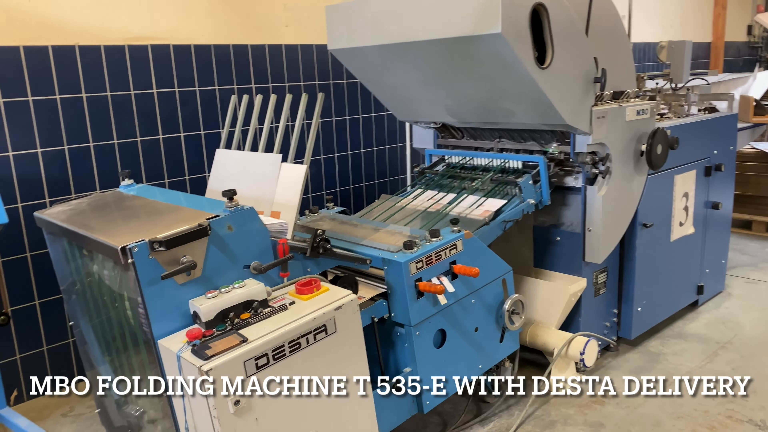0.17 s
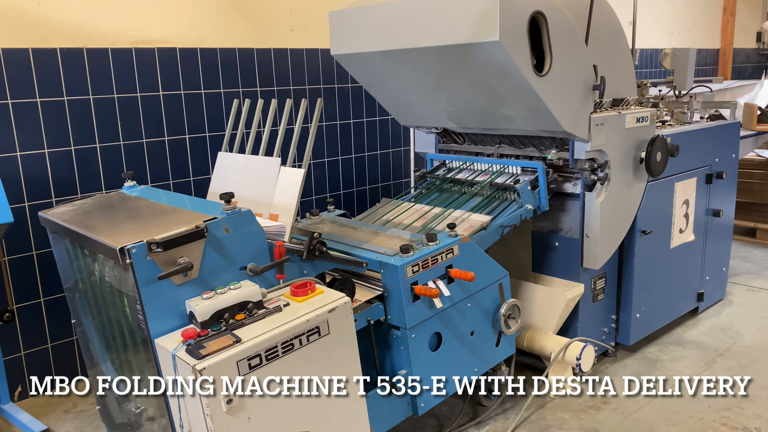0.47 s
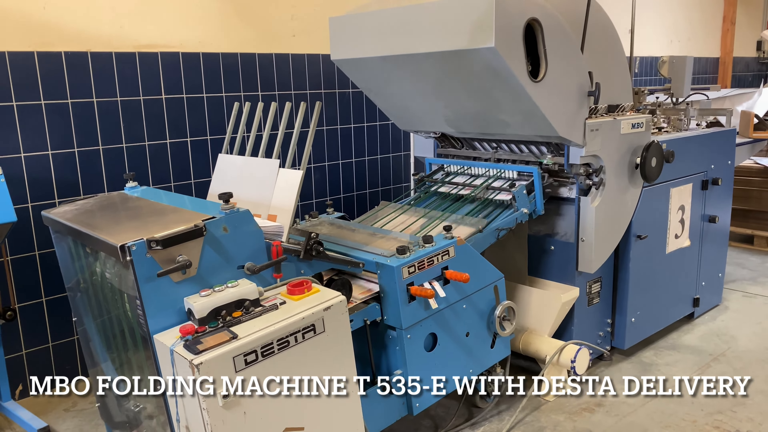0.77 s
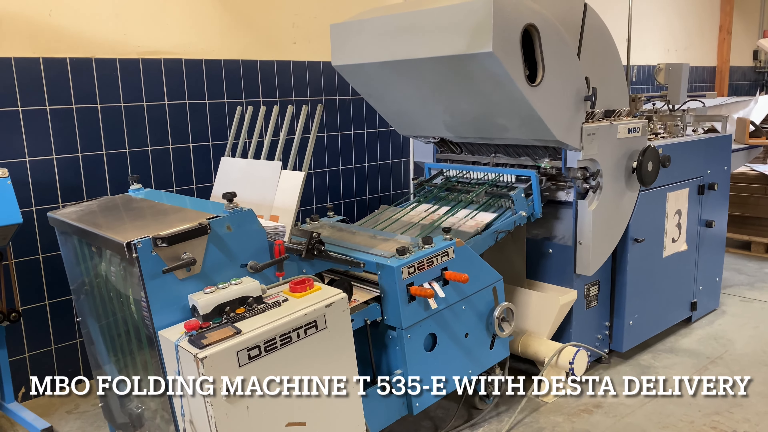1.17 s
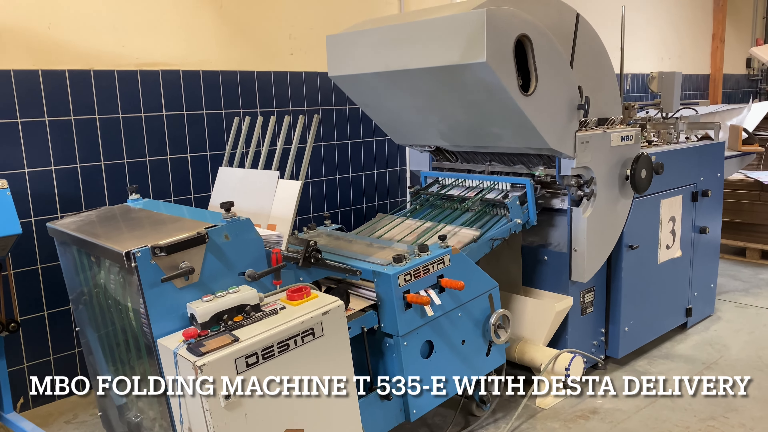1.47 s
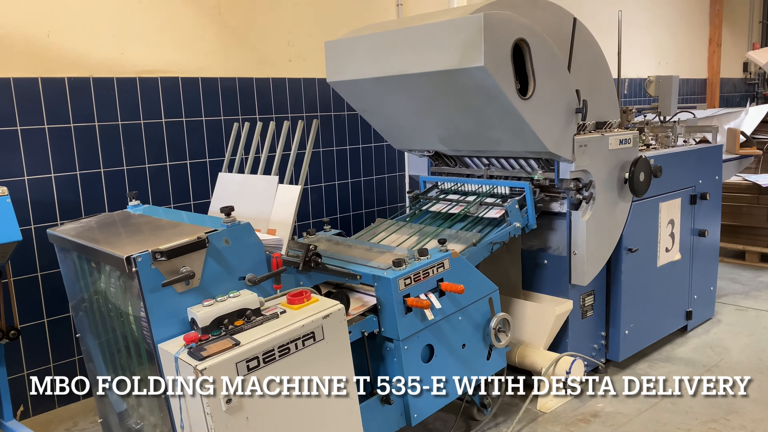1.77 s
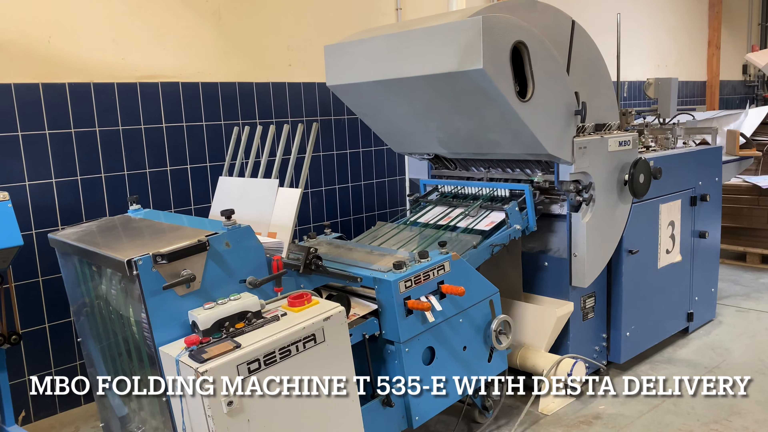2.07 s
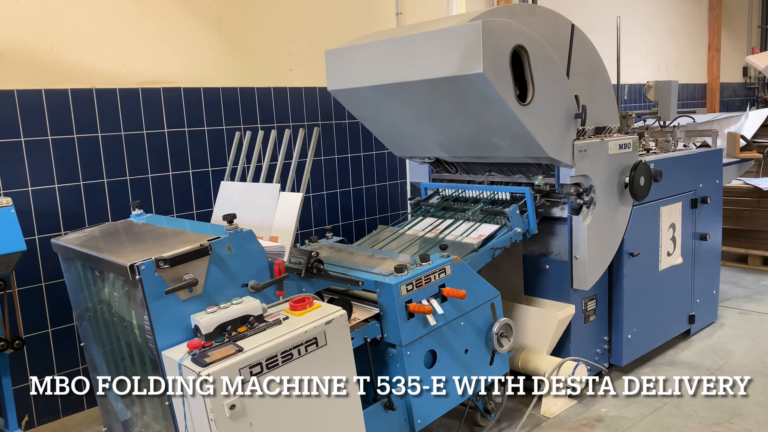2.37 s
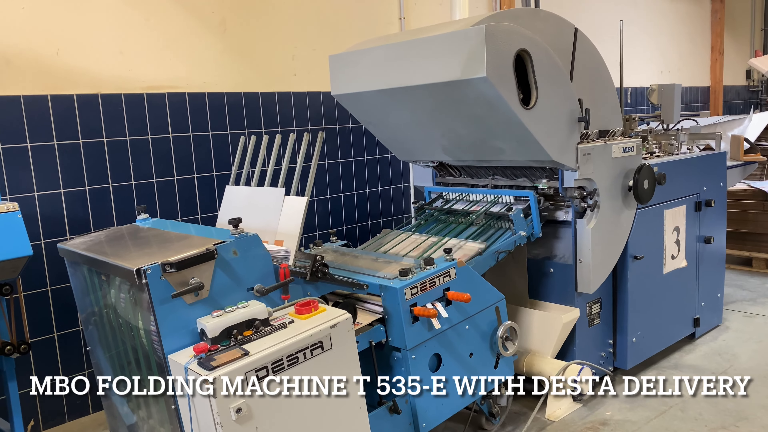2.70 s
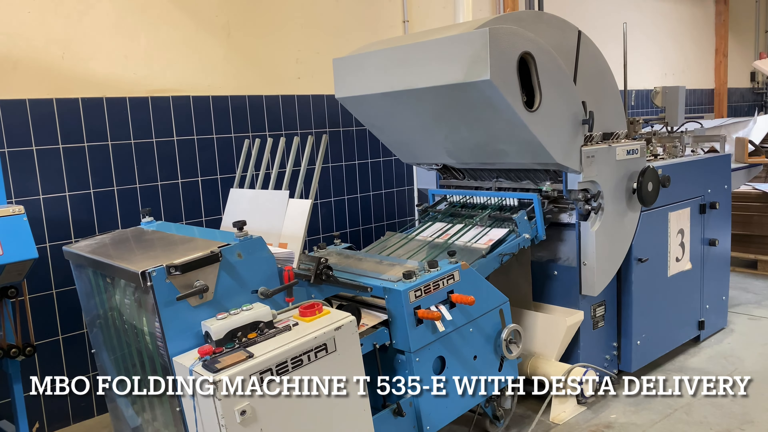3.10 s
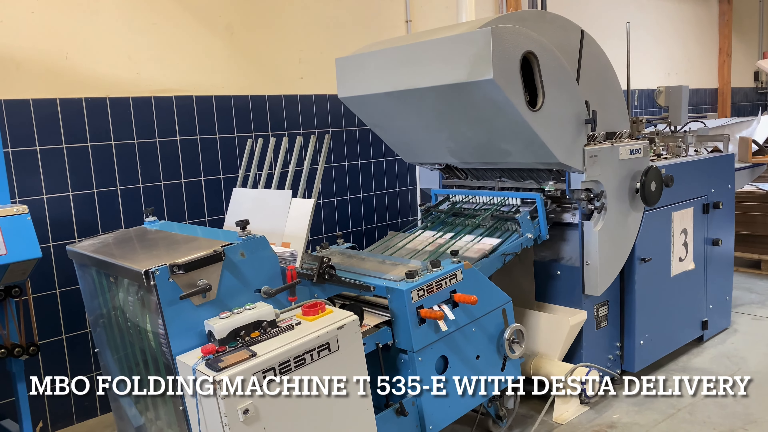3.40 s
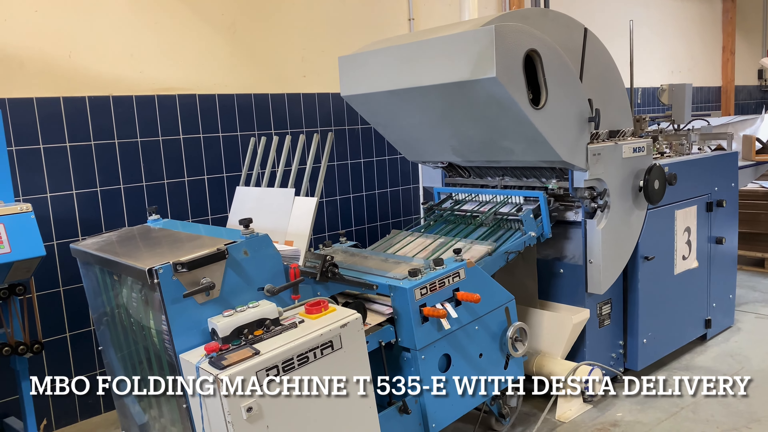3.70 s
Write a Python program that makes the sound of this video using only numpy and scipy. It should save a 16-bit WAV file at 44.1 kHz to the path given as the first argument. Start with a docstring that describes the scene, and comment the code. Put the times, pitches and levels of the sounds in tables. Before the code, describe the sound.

A paper folding machine is already running at 0 s and continues to about 4 s in a reverberant workshop. Every quarter second, two bright steel clacks fall almost together, then a lighter tap and airy paper swish. Grainy roller rattle, random ticking, hiss, low rumble and faint whines persist. Brief rough squeals recur mostly before 2.5 s, strongest near 1 s; the running noise softens slightly after 3 s.

```python
"""A paper folding machine in a tiled workshop: steel blows of noise, clinks and frame modes, four sheets a second.
Each sheet brings two clacks, then a lighter tap just over half a cycle later and a swish of filtered noise.
Underneath, grainy noise makes rollers, air hiss, motor rumble and a hollow drone; small clinks make the ticking.
Unsteady sines make the drive whines and a recurring rough squeal; noise-fed resonators hum as the frame.
Two low knocks come from the body, and the room answers each blow with a tail of fading noise."""
import sys
import numpy as np
from scipy import signal
from scipy.fft import rfft, irfft, next_fast_len
from scipy.io import wavfile
from scipy.ndimage import map_coordinates

SR = 44100
rng = np.random.default_rng(int(sys.argv[2]) if len(sys.argv) > 2 else 0)


def unload_audio(sound):
    """Save the sound as a 16-bit wav file, at the path given as the first command line argument."""
    columns = np.transpose(np.atleast_2d(sound))
    # keep every value between -1 and 1, then stretch to whole-number steps
    steps = np.round(np.clip(columns, -1, 1) * 32767)
    wavfile.write(sys.argv[1], SR, steps.astype(np.int16))


N = 169785

# The blows of each sheet, relative levels: first_clack_s, first_clack_db, second_clack_db, tap_db,
# frame_ring_db, first_tilt_db_per_octave, second_opening_contact_db, second_tilt_db_per_octave
SHEETS = [(.065, 0, 2.5, -1, 0, 1, -1, -3.5), (.314, 1, 0, -1.5, -1.5, -2.5, 6, 2),
          (.562, 1.5, 0, 0.5, 0, -2, -8, 1), (.809, 1.5, 1, 0, -4, -1, 4.5, -.5),
          (1.055, -0.5, 2.5, 1, -4, -1, 2.5, -3), (1.302, 0, -1.5, -0.5, 0.5, -.5, 8.5, -2),
          (1.549, -0.5, -3.5, -3.5, 0.5, -2, 5, 2.5), (1.795, -1, -0.5, -0.5, 1.5, 0, 9.5, 1.5),
          (2.041, 0.5, 1, 0, -3, -3, 6.5, -1.5), (2.289, 1.5, 2.5, -6.5, -1, -3, 3, 3),
          (2.537, 0, 1, -2, -7, -1, -8, -2.5), (2.784, -1, 1, -2.5, 0, .5, 3.5, 0.5),
          (3.031, -3, -3, -2, 2.5, 0.5, -5, 2.5), (3.278, -5.5, -2.5, -4, 2.5, 2, -7, 0.5),
          (3.525, -3.5, -2, -6, 1, 1, -3, 2), (3.772, -4.5, 0.5, -12, -3.5, 2.5, -1, 0.5)]
SECOND_S, TAP_S = .0213, .1398  # after the first clack
# Contacts within one blow: delay_s, level_db
FIRST_BOUNCES = [(.0002, -3), (.0025, -2), (.0068, -1)]
SECOND_BOUNCES = [(0, -2.5), (.0026, -2), (.0075, -3)]
TAP_BOUNCES = [(0, -2.5), (.0022, -5.5)]
# Relative colour of each kind of blow: frequency_hz, level_db
FIRST_COLOUR = [(200, -47), (420, -27.5), (620, -19.5), (950, 2.5), (1200, -7), (1450, -4.5), (2200, -1),
                (3600, 2), (4800, -3), (5800, -10), (7400, -11.5), (9000, -7), (12000, -13.5), (15500, -27)]
SECOND_COLOUR = [(200, -40), (420, -26), (620, -19), (950, -16), (1200, -8), (1450, -2.5), (1800, 1.5),
                 (2400, 1.5), (3600, 2), (4700, 0), (5800, -6), (7400, -14.5), (9000, -7.5), (12000, -20),
                 (15500, -36)]
TAP_COLOUR = [(200, -23), (450, -17), (900, -7), (1200, -7.5), (1550, -7), (1900, -4.5), (2350, 1.5),
              (3200, -13), (4500, -6), (7400, -16.5), (9500, -13.5), (15500, -43)]
# Modes of the steel frame: pitch_hz, relative level_db, t60_s
FRAME_MODES = [(550.6, -10, 0.059), (642.5, -4.5, 0.12), (788.6, -10, 0.19), (916, -12.5, 0.084),
               (1363, -1.5, 0.12), (1427, 1.5, 0.099), (1525, -7, 0.11), (1705, 5.5, 0.076),
               (1821, 1.5, 0.12), (2080, -0.5, 0.11), (2146, -0.5, 0.14), (2595, -4, 0.2),
               (2870, 2.5, 0.086), (4200, 1, 0.069)]
# Course of the running noise, before each layer's offset: time_s, level_db
RUNNING = [(0.0, -30), (0.46, -30), (1.15, -30.5), (1.41, -31.5), (2.29, -31), (3.32, -34.5), (3.85, -34)]
# Relative colour of the steady noise layers: frequency_hz, level_db (per Hz)
ROLLER_COLOUR = [(150, -25), (460, -35), (570, -2.5), (660, 4), (820, 3), (1050, -1.5), (1250, -4),
                 (1650, 2.5), (2200, -4.5), (3000, -3.5), (4500, -6.5), (5800, -12), (7500, -14.5),
                 (12000, -62)]
AIR_COLOUR = [(2000, -24), (5000, 3), (6500, -4.5), (7500, -3.5), (8400, 0.5), (10200, 3.5), (12000, -1.5),
              (14200, -11.5), (15000, -51)]
RUMBLE_COLOUR = [(20, -28), (35, -10), (52, 2), (75, -1), (100, -3), (135, 0), (200, 2), (290, -4),
                 (350, -0.5), (450, -11), (800, -29)]
DRONE_COLOUR = [(220, -30), (320, -7.5), (500, 10), (620, -22)]
# Course of the hollow drone: time_s, level_db
DRONE_LEVEL = [(0, -47), (.7, -56), (2.2, -52.5), (3.1, -64)]
# Colour of the ticking: frequency_hz, relative level_db
TICK_COLOUR = [(300, -17), (650, 1.5), (2000, -0.5), (4500, 5), (7000, -9), (14000, -32)]
# Dull knocks in the machine's body: start_s, level_db
KNOCKS = [(.165, -41), (2.61, -46)]
# Gear and bearing tones: pitch_hz, level_db (rms, around which the running level moves)
WHINES = [(140, -65.5), (936, -72), (1189, -55), (1357, -59.5), (3968, -53), (6454, -57.5)]
# Spurts of squeal: middle_s, half_length_s, level_db
SQUEALS = [(0.093, 0.071, -37), (0.275, 0.055, -36.5), (0.497, .03, -39), (.755, 0.022, -37),
           (1.01, 0.044, -31), (1.244, .03, -42), (1.744, 0.023, -37), (2.237, .05, -38), (2.5, 0.038, -41),
           (3.21, 0.037, -42)]
SQUEAL_HZ, SQUEAL_LEAD_RAD = 1670, -1.4  # the lead is left over right
# Decay of the room: frequency_hz, t60_s
ROOM_DECAY = [(200, 0.45), (1000, 1), (3000, 0.55), (6000, 0.31), (14000, 0.18)]
# Phase between the two microphones for near and for diffuse sound: frequency_hz, left_lead_rad
NEAR_PHASE = [(300, -1), (700, -1.5), (950, -0.88), (1350, -2), (1750, -1.45), (2300, -2), (3500, -2.5),
              (4500, -4.5), (5500, -4), (6400, -5.5), (7500, -8.5), (9100, -4), (10000, -8), (12000, -4.5)]
FAR_PHASE = [(50, 0.66), (150, 2), (300, 1.62), (420, -2.05), (1300, -1.8), (2000, 0.45), (2800, 2.5),
             (4500, 1.5), (5500, -4), (6400, 2.5), (7500, -3), (9100, 2), (10000, -1.5), (12000, 0)]
# Likeness of left and right in diffuse sound, clipped to -1..1 in use: frequency_hz, likeness
ALIKE = [(50, 0), (150, 1), (320, 0.16), (600, 1), (1100, 0), (1700, 0.28), (4500, -0.02), (6400, 0.5),
         (9000, 0.6), (10500, 7.2), (12000, 9.7)]
# Channel balance: frequency_hz, left_minus_right_db
BALANCE = [(50, 0), (130, 6), (400, 2.5), (900, 0), (1400, -1.5), (2200, -0.5), (3500, -2), (5600, -3),
           (7100, 2.5), (7800, -4.5), (9000, 2), (9700, -2.5), (11500, 0)]
MONO_HZ, TOP_HZ = 11700, 15800  # one shared channel from MONO_HZ up; band limit


def amp(db):
    """Decibels to gain."""
    return 10 ** (np.asarray(db) / 20)


def unit(x):
    """Scale to rms 1."""
    return x / np.sqrt(np.mean(x ** 2) + 1e-20)


def along(points, hz):
    """Read (Hz, value) points on a log frequency axis."""
    f, v = np.transpose(points)
    return np.interp(np.log(hz + 1), np.log(f + 1), v)


def curve(rows):
    """Draw (s, value) points as one value per sample."""
    return np.interp(np.arange(N) / SR, *np.transpose(rows))


def wobble(rate):
    """A smooth random curve, rate knots a second."""
    knots = rng.standard_normal(int(N * rate / SR) + 4)
    return map_coordinates(knots, [np.arange(N) * rate / SR])


def filtered(x, response):
    """Shape x with a complex response of frequency."""
    n = x.shape[-1]
    m = next_fast_len(n + SR // 10, True)
    return irfft(rfft(x, m) * response(np.fft.rfftfreq(m, 1 / SR)), m)[..., :n]


def causal(points, size=1024):
    """A minimum-phase impulse response of energy 1 with the given colour."""
    cepstrum = irfft(np.log(amp(along(points, np.fft.rfftfreq(size, 1 / SR)))))
    # fold the cepstrum forward so that nothing sounds ahead of the blow
    cepstrum[1:size // 2] *= 2
    cepstrum[size // 2 + 1:] = 0
    h = irfft(np.exp(rfft(cepstrum)))
    return h / np.linalg.norm(h)


def add(track, s, sound):
    """Mix a sound into a track at s seconds."""
    i = max(0, round(s * SR))
    part = track[..., i:i + sound.shape[-1]]
    part += sound[..., :part.shape[-1]]


def ports(x, phase):
    """Set the phase difference between the two microphones."""
    halves = np.array([[1], [-1]])
    return filtered(x, lambda hz: np.exp(.5j * along(phase, hz) * halves))


def diffuse(pair):
    """Blend two unrelated signals into sound arriving from all round."""
    def weights(hz):
        turn = np.arccos(np.clip(along(ALIKE, hz), -1, 1)) / 2
        return np.array([np.cos(turn), np.sin(turn)])
    mid, side = filtered(pair, weights)
    return ports(np.array([mid + side, mid - side]), FAR_PHASE)


def rush(colour, grain_db):
    """Diffuse noise of rms 1, broken into tiny impacts by grain_db."""
    pair = rng.standard_normal((2, N)) * amp(grain_db * wobble(700))
    return unit(diffuse(filtered(pair, lambda hz: amp(along(colour, hz)))))


def burst(t, t60, grain_db=0):
    """Dying noise of energy 1, broken into chatter by grain_db."""
    chatter = map_coordinates(rng.standard_normal(200), [t * 450])
    x = rng.standard_normal(len(t)) * amp(grain_db * chatter - 60 * t / t60)
    return x / np.linalg.norm(x)


def clink(t, centre_hz, spread, t60, count):
    """A small steel part rings briefly with energy 1, its modes drawn afresh each time."""
    hz = centre_hz * np.exp(spread * rng.standard_normal((count, 1)))
    hz = np.minimum(hz, TOP_HZ)
    modes = np.sin(2 * np.pi * (hz * t + rng.random((count, 1))))
    x = modes.sum(0) * amp(-60 * t / t60)
    return x / np.linalg.norm(x)


def tone(hz, waver_hz, flutter_db, port_turns):
    """An unsteady tone of rms 1 whose phase drifts between the microphones."""
    turns = np.cumsum(hz + waver_hz * wobble(40)) / SR
    drift = port_turns * np.array([wobble(2.7), wobble(2.87)])
    flutter = amp(flutter_db * np.tanh(2 * wobble(26)))
    return unit(flutter * np.sin(2 * np.pi * (turns + drift)))


def rollers():
    """Rollers and belts rattle: noise with a coarse grain and an uneven level."""
    return amp(curve(RUNNING) - 3.0 + 0.83 * wobble(24.86)) * rush(ROLLER_COLOUR, grain_db=3.0)


def ticks(per_s, centre_hz, t60, scatter_db):
    """Guide balls and linkage tick at random against the rollers; rms 1."""
    t = np.arange(SR // 12) / SR
    out = np.zeros((2, N))
    slots = rng.random((600, 4))
    for place, chance, size, side in slots:
        if chance < per_s * N / SR / len(slots):
            tick = clink(t, centre_hz, spread=.55, t60=t60, count=5) + .5 * burst(t, 0.0055)
            angle = 2 * np.pi * side
            pan = np.array([[np.cos(angle)], [np.sin(angle)]])
            add(out, place * N / SR, amp(scatter_db * size) * pan * tick)
    return unit(diffuse(filtered(out, lambda hz: amp(along(TICK_COLOUR, hz)))))


def air():
    """Air hiss: high, fine-grained noise with a slowly uneven level."""
    return amp(-40.0 + 1.6 * wobble(8.83)) * rush(AIR_COLOUR, grain_db=1.0)


def rumble():
    """Motor rumble: low noise that follows the running level a little more than one to one."""
    level_db = curve(RUNNING)
    swing_db = 1.17 * (level_db - level_db.mean())
    return amp(swing_db - 50.0 + 1.55 * wobble(10)) * rush(RUMBLE_COLOUR, grain_db=1.5)


def drone():
    """A hollow band of the running noise, rising and falling on its own course."""
    return amp(curve(DRONE_LEVEL) + 3.2 * wobble(11)) * rush(DRONE_COLOUR, grain_db=-3.5)


def knocks(hz, t60):
    """Soft, low knocks in the machine's body: dying sines with a softened start."""
    t = np.arange(SR // 4) / SR
    knock = np.sin(2 * np.pi * hz * t) * amp(-60 * t / t60) * (1 - np.exp(-t / .006))
    out = np.zeros(N)
    for s, db in KNOCKS:
        add(out, s, amp(db) * knock)
    return ports(out, FAR_PHASE)


def drive():
    """The running gear: rollers, ticking, air, motor and body together."""
    ticking = ticks(per_s=60, centre_hz=1697, t60=0.099, scatter_db=15.5)
    ticking = amp(curve(RUNNING) - 7.0) * ticking
    return rollers() + ticking + air() + rumble() + drone() + knocks(hz=119, t60=0.29)


def whine():
    """Faint tones of gears and bearings, moving with the running level."""
    level_db = curve(RUNNING)
    tones = sum(amp(db) * tone(hz, waver_hz=4.3, flutter_db=2.0, port_turns=0.08) for hz, db in WHINES)
    return amp(level_db - level_db.mean()) * tones


def frame_hum(level_db, tilt_db, swell_db):
    """Noise keeps the frame's resonant modes faintly ringing, each swelling by itself."""
    out = np.zeros((2, N))
    for hz, db, t60 in FRAME_MODES:
        r = np.exp(-np.log(1000) / (t60 * SR))  # pole radius that gives the mode's decay
        poles = [1, -2 * r * np.cos(2 * np.pi * hz / SR), r * r]
        ring = signal.lfilter([1, 0, -1], poles, rng.standard_normal((2, N)))
        mode_db = db + tilt_db * np.log2(hz / 1000) + swell_db * wobble(11)
        out += amp(mode_db) * unit(ring)
    return amp(curve(RUNNING) + level_db) * unit(diffuse(out))


def squeal(rough_db):
    """A roller rubs and sings roughly, in short spurts."""
    s, half_s, db = np.transpose(SQUEALS)[:, :, None]
    spurts = np.exp(-.5 * ((np.arange(N) / SR - s) / half_s) ** 4)
    rubbing = (amp(db) * spurts).sum(0)
    voice = tone(SQUEAL_HZ, waver_hz=10.6, flutter_db=0.0, port_turns=0.037)
    voice = voice * amp(rough_db * np.tanh(wobble(170)))
    return rubbing * unit(ports(voice, [(SQUEAL_HZ, SQUEAL_LEAD_RAD)]))


def room_tail():
    """A fresh pair of room tails: fading noise whose treble dies first."""
    hz, t, z = signal.stft(rng.standard_normal((2, SR // 2)), SR, nperseg=256)
    decay = amp(-60 * t / along(ROOM_DECAY, hz)[:, None])
    onset = 1 - np.exp(-t / 0.0023)
    tail = signal.istft(z * decay * onset, SR, nperseg=256)[1]
    return tail / np.linalg.norm(tail[0])


def contacts(t, bounces, strike_db, crack_s, rattle_s, rattle_db, clink_db, clink_hz):
    """Steel meets steel a few times, each a crack with a clink, over a short rattle of linkage."""
    blow = amp(rattle_db) * burst(t, rattle_s, grain_db=4.0) * (1 - np.exp(-t / 0.0023))
    for k, (delay, bounce_db) in enumerate(bounces):
        crack = burst(t, crack_s) * (1 - np.exp(-t / 0.00054))
        contact = crack + amp(clink_db) * clink(t, clink_hz, spread=.4, t60=0.11, count=12)
        # only the opening contact takes the strike level
        level_db = bounce_db + strike_db * (k == 0) + rng.normal(0, 0.85)
        add(blow, delay + rng.normal(0, 0.00028), amp(level_db) * contact)
    return blow


def frame_ring(t):
    """The struck frame rings in its modes with energy 1, their levels and pitches varied per blow."""
    hz, mode_db, t60 = np.transpose(FRAME_MODES)[:, :, None]
    level_db = mode_db + rng.uniform(-6, 8, hz.shape) - 60 * t / t60
    turns = hz * t * rng.normal(1, 0.0076, hz.shape) + rng.random(hz.shape)
    modes = amp(level_db) * np.sin(2 * np.pi * turns)
    body = modes.sum(0) * (1 - np.exp(-t / 0.0086))
    return body / np.linalg.norm(body)


def blows(times, levels_db, rings_db, strikes_db, tilts_db, bounces, colour, ring_db, room_db, **steel):
    """Each blow is a group of steel contacts, the frame's ring and the room's answer."""
    t = np.arange(SR // 5) / SR
    near, ring, far = np.zeros(N), np.zeros(N), np.zeros((2, N))
    for s, db, frame_db, strike_db, tilt_db in zip(times, levels_db, rings_db, strikes_db, tilts_db):
        blow = contacts(t, bounces, strike_db, **steel)
        # brightness tilts around 2200 Hz
        tilted = filtered(blow, lambda hz: amp(tilt_db * np.log2(np.clip(hz, 600, 6000) / 2200)))
        add(near, s, amp(db) * tilted)
        add(ring, s, amp(db + frame_db + ring_db) * frame_ring(t))
        add(far, s, amp(db + room_db) * room_tail())
    h = causal(colour)
    direct = signal.fftconvolve(near, h)[:N] + ring
    answer = signal.fftconvolve(far, h[None], axes=1)[:, :N]
    return ports(direct, NEAR_PHASE) + diffuse(answer)


def mechanism():
    """The steel mechanism strikes two clacks and a tap for every sheet."""
    s, first_db, second_db, tap_db, ring_db, first_tilt, strike_db, second_tilt = np.transpose(SHEETS)
    even = np.zeros(len(s))
    first = blows(s, first_db, ring_db, even, first_tilt, FIRST_BOUNCES, FIRST_COLOUR,
                  crack_s=0.0071, rattle_s=0.054, rattle_db=-.5,
                  clink_db=-7, clink_hz=2698, ring_db=-4.0, room_db=-1.5)
    second = blows(s + SECOND_S, second_db, ring_db, strike_db, second_tilt, SECOND_BOUNCES, SECOND_COLOUR,
                   crack_s=0.0095, rattle_s=0.056, rattle_db=2.5,
                   clink_db=-7, clink_hz=2794, ring_db=2.0, room_db=-3.5)
    tap = blows(s + TAP_S, tap_db, ring_db, even, even, TAP_BOUNCES, TAP_COLOUR,
                crack_s=0.0036, rattle_s=0.23, rattle_db=-10.5,
                clink_db=-10.5, clink_hz=1908, ring_db=-12.0, room_db=-7.5)
    return amp(6.0) * first + amp(4.5) * second + amp(6.5) * tap


def paper(delay_s, width_s, level_db):
    """Each sheet swishes through the rollers: one smooth swell of airy noise after its first clack."""
    since = np.arange(N) / SR - np.array(SHEETS)[:, :1] - delay_s
    swells = np.exp(-.5 * (since / width_s) ** 2).sum(0)
    return amp(level_db) * swells * rush(AIR_COLOUR, grain_db=2.0)


def scene():
    """The whole machine, as the two microphones hear it."""
    machine = drive() + whine() + frame_hum(level_db=-7.0, tilt_db=-5, swell_db=3.5)
    machine += squeal(rough_db=-2.0) + mechanism()
    machine += paper(delay_s=0.11, width_s=0.083, level_db=-42.0)
    halves = np.array([[.5], [-.5]])  # left takes half the balance, right the opposite half
    return filtered(machine, lambda hz: amp(along(BALANCE, hz) * halves))


def record(dry):
    """Both channels share the left microphone in the top treble, and nothing passes the band limit."""
    stereo = filtered(dry, lambda hz: hz < MONO_HZ)
    shared_treble = filtered(dry[0], lambda hz: (hz >= MONO_HZ) & (hz < TOP_HZ))
    return stereo + shared_treble


dry = scene()
out = record(dry)
unload_audio(out)
```